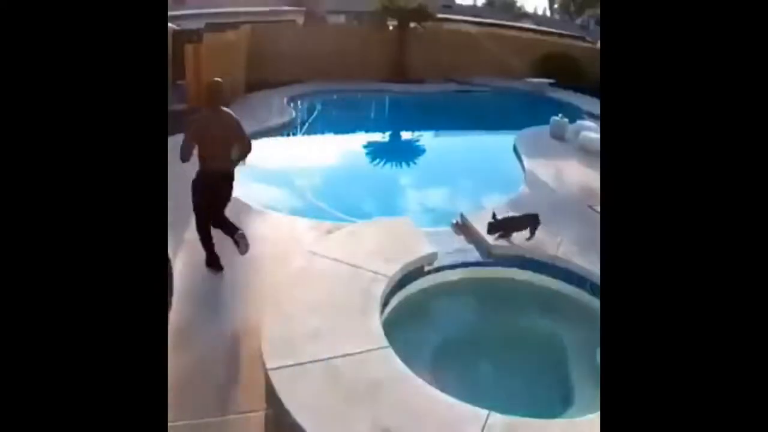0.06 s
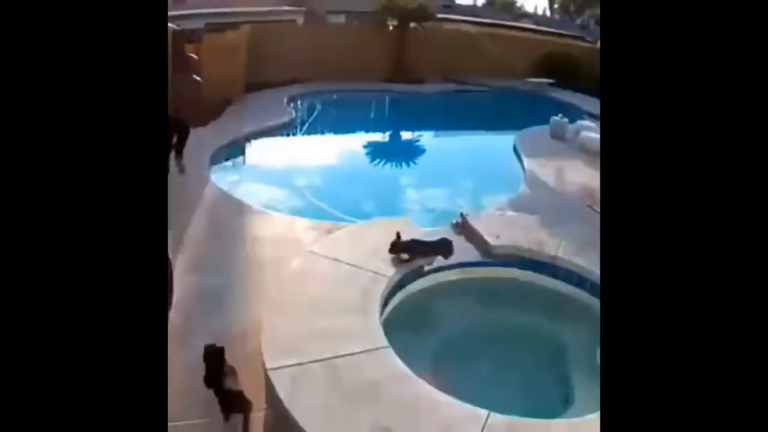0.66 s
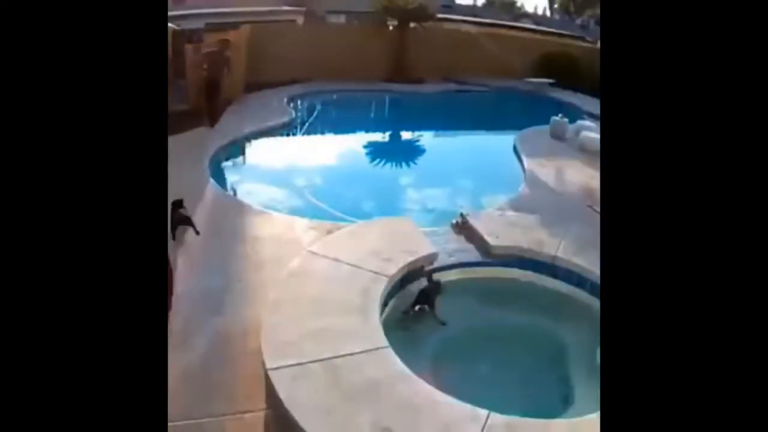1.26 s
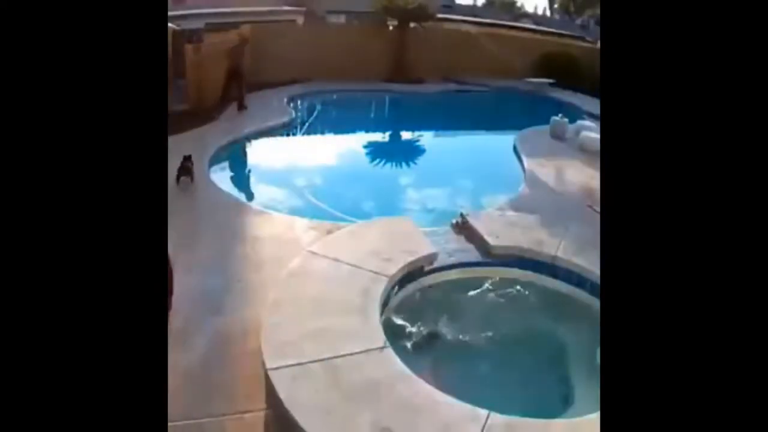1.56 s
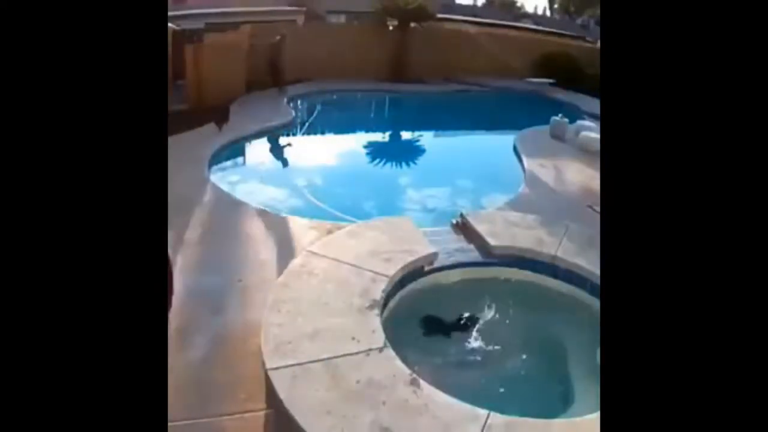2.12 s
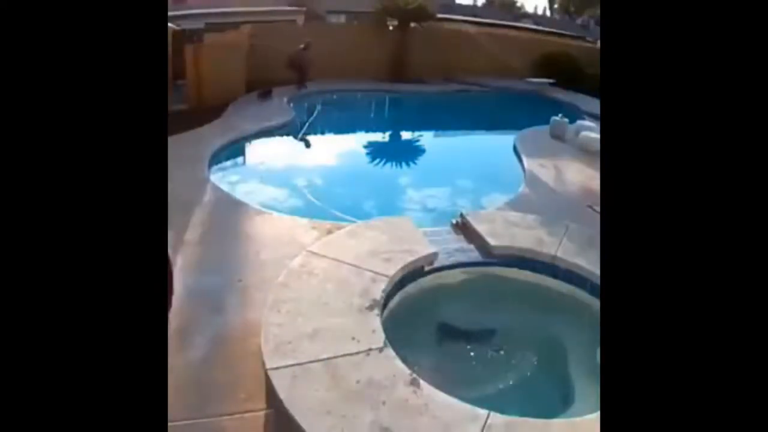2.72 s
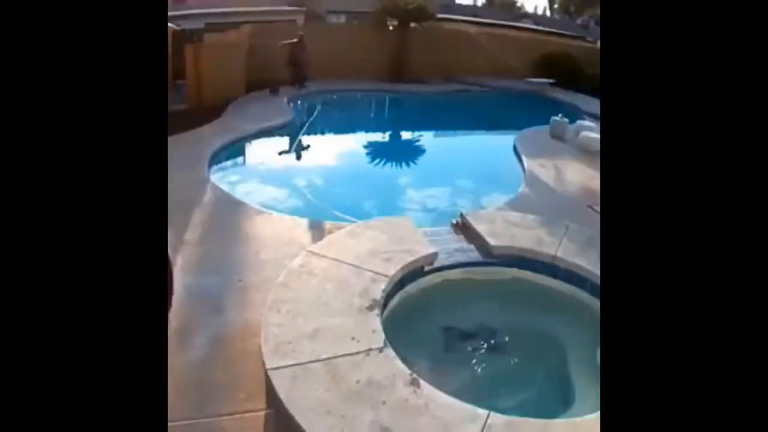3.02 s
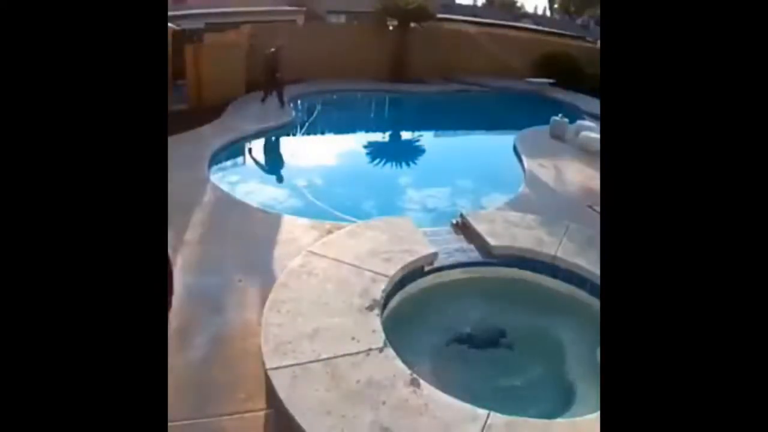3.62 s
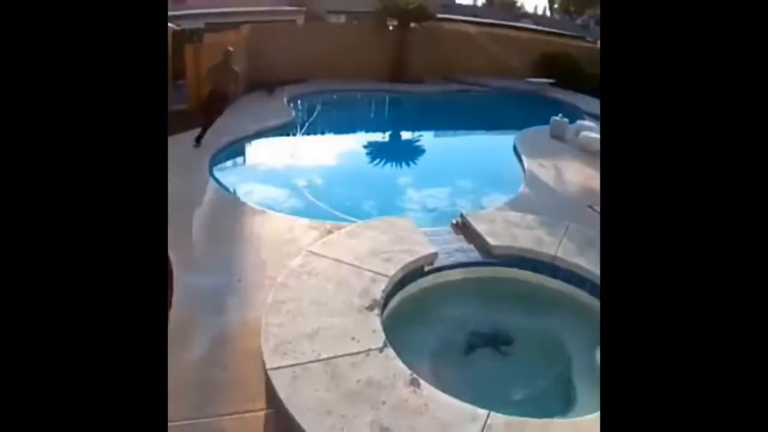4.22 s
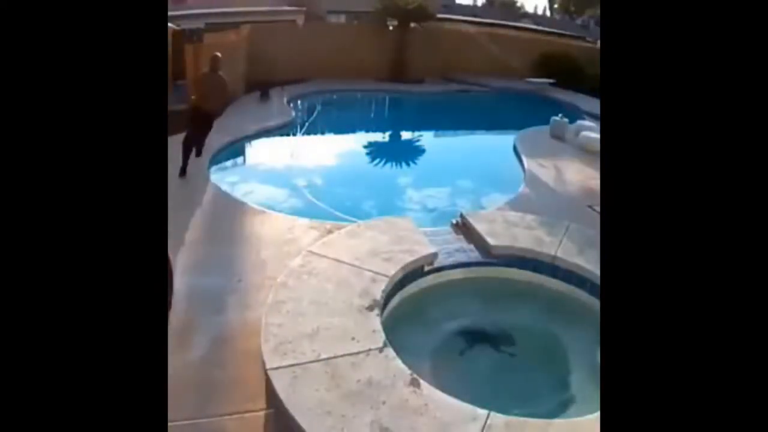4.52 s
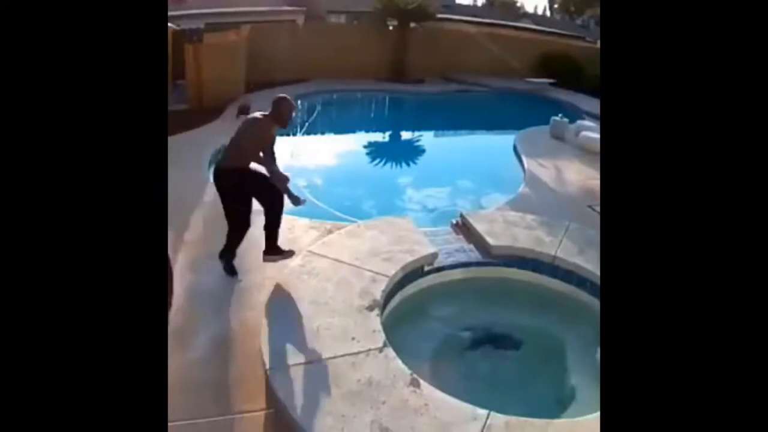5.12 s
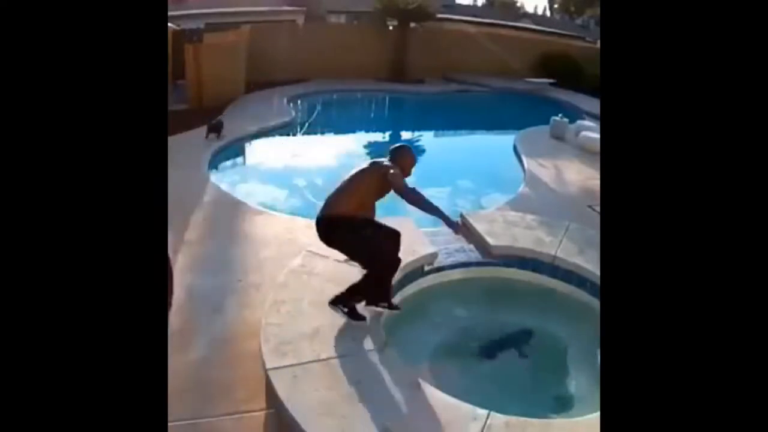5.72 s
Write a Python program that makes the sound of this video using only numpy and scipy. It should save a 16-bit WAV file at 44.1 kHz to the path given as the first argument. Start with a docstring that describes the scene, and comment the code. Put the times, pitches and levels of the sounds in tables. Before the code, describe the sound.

Shoes and paws scuff over a gritty concrete pool deck. A small dog falls into a hot tub with a splash, paddles with pattering spray and low gulps, then sinks, leaving fizzing bubbles and soft laps. Running footsteps come back and end in sharp, loud slaps at the rim. A faint distant engine hums and a light breeze touches the small, slightly dull microphone outdoors.

```python
"""Shoes scuff away over the concrete of a backyard pool deck, and a small dog scrabbles at a hot tub's rim.
It falls in: spray patters and trapped air gulps as it paddles, then the water fizzes and laps as it sinks.
The man who ran off sprints back, and his soles slap down at the rim. Far off an engine hums.
All is heard in the open air on one small, narrow-band camera microphone, a light breeze touching it."""
import sys
import numpy as np
from scipy import signal
from scipy.fft import rfft, irfft
from scipy.io import wavfile

SR = 44100
rng = np.random.default_rng(int(sys.argv[2]) if len(sys.argv) > 2 else 0)


def output_pcm(signal):
    """Save a mono or channel-first signal as 16-bit PCM at the path in sys.argv[1].

    Samples are clipped to [-1, 1] before scaling.
    """
    pcm = np.clip(np.atleast_2d(signal).T, -1, 1) * 32767
    wavfile.write(sys.argv[1], SR, np.round(pcm).astype(np.int16))


N = 254456
T = np.arange(N) / SR

# Soles and paws dragging on the deck. Each row: peak in seconds, hiss in dB, rasp in dB, rise in seconds.
DECK_SCUFFS = [(0.104, -34.5, -73, .0025), (0.136, -29.5, -48, 0.01), (.254, -35, -52, 0.033),
               (0.335, -29.5, -50.5, 0.018), (0.469, -33.5, -64, 0.011), (.535, -40.5, -56, 0.0051),
               (0.583, -39.5, -44, 0.019), (.663, -38.5, -53.5, 0.048), (0.726, -41.5, -54, 0.02),
               (0.878, -39, -51, 0.022), (0.91, -39.5, -63, 0.017), (1.032, -35, -46.5, 0.011),
               (3.63, -51, -57.5, 0.016), (3.971, -49.5, -54, 0.013), (4.505, -53, -54, 0.025),
               (4.916, -47.5, -47.5, 0.034), (5.016, -45, -57, 0.019), (5.142, -54, -42.5, 0.013)]
# Lone bubbles, squeaks and thumps.
# Each row: start in seconds, first and last pitch in Hz, length in seconds, level in dB.
GLIDES = [(0.135, 1190, 1730, 0.019, -39.5), (.215, 178, 143, 0.018, -50), (1.405, 184, 154, 0.031, -41.5),
          (2.796, 3510, 3860, 0.01, -47), (2.877, 998, 1194, 0.054, -54.5), (5.315, 823, 1597, 0.033, -47),
          (5.526, 2970, 2860, 0.011, -51.5)]
# Soles and claws touching down. Each row: start in seconds, click in dB, knock in Hz, knock in dB.
FOOTFALLS = [(.189, -36, 1440, -43), (0.406, -50, 1360, -56), (0.59, -54, 2080, -41),
             (.730, -56, 1400, -47), (3.626, -62, 3900, -48.5), (4.289, -45.5, 675, -42),
             (4.319, -51, 2270, -50), (4.354, -53, 1920, -47.5), (4.582, -46, 710, -47.5),
             (4.6, -44.5, 2030, -42), (4.631, -53, 2100, -49), (4.726, -47, 1950, -38),
             (4.743, -52, 2400, -46), (4.835, -41.5, 1950, -42.5), (4.8574, -40.5, 2000, -39.5),
             (4.891, -45, 503, -47.5), (4.9354, -35.5, 840, -45), (5.114, -45.5, 660, -45.5),
             (5.1232, -43, 2010, -56), (5.728, -40, 2560, -40)]
# Wind on the microphone. Each row: peak in seconds, level in dB, rise and fall in seconds.
WIND_PUFFS = [(.2, -52.5, 0.26), (.55, -53, 0.073), (5.03, -56, 0.44)]
# The far engine's speed. Each row: time in seconds, firing rate in Hz.
ENGINE_FIRING = [(.7, 71.5), (1.08, 75.6), (1.3, 86.07), (3.3, 82.8)]
# The dog's body and legs plunging into the tub.
# Each row: peak in seconds, spray in dB, air pocket in Hz, pocket in dB, fall in seconds.
DOG_PLUNGES = [(1.292, -45, 593, -42, 0.025), (1.315, -28.5, 600, -48, 0.0087),
               (1.396, -49, 350, -37, 0.012), (1.419, -32.5, 176, -51, 0.03),
               (1.452, -33, 537, -43.5, 0.024), (1.527, -48, 595, -39, 0.023),
               (1.642, -45, 465, -32.5, 0.025), (2.089, -31, 570, -41, 0.08),
               (2.108, -36, 104, -48.5, 0.02), (2.112, -40, 545, -31, 0.0093),
               (2.162, -41, 575, -34.5, 0.025)]
# Lone drops and flicks of water. Each row: start in seconds, level in dB, pitch in Hz.
WATER_DROPS = [(1.254, -37.5, 5060), (1.36, -38.5, 6300), (1.83, -34.5, 6300), (2.278, -39, 6460),
               (2.308, -40, 2200), (2.35, -37, 5470), (2.526, -42, 4550), (2.597, -51, 6500),
               (3.136, -50, 4100)]
# Air from the sunken dog reaching the surface. Each row: peak in seconds, level in dB.
AIR_FIZZES = [(2.53, -74), (2.62, -50), (2.939, -52), (3.14, -55), (3.3, -56.5)]
# Waves against the tub wall. Each row: peak in seconds, level in dB, rise and fall in seconds.
WALL_LAPS = [(3.27, -52, 0.078), (3.72, -54.5, 0.13), (4.08, -55, 0.1)]
# Shoes striking the deck at the rim.
# Each row: start in seconds, clap in dB, clap in Hz, heel thud in dB, crunch's 60 dB decay in seconds.
SHOE_SLAPS = [(5.1535, -28.5, 1850, -27, 0.0077), (5.156, -39, 2090, -30.5, 0.012),
              (5.5910, -23, 2410, -34, 0.0064), (5.6, -20.5, 2600, -56, 0.016),
              (5.6034, -21.5, 2880, -29.5, 0.018), (5.6559, -29, 2320, -27, 0.029)]

# The tone colour of each source at the microphone. Each row: frequency in Hz, relative level in dB.
AIR_COLOUR = [(25, -0.5), (65, 5), (200, -0.5), (746, -8), (1050, -9), (1550, -16.5), (1970, -9),
              (2400, -20.5), (7300, -23.5)]
HISS_COLOUR = [(400, -29), (1500, -35), (2700, -8), (4500, -1), (5500, 0), (6700, 4.5), (8000, 0)]  # deck grit and fine bubbles
RASP_COLOUR = [(80, 5.5), (200, -1), (700, 7), (900, -2), (1250, -4), (1650, -5), (2000, 3), (2800, -4),
               (4000, 5.5), (8000, -22.5)]
CLICK_COLOUR = [(400, -12), (2000, 1.5), (4000, -0.5), (8000, -3)]
SPRAY_COLOUR = [(300, -43), (800, -8), (950, -8.5), (1300, -0.5), (1650, -10), (2050, 1), (2350, -7.5),
                (2650, 0), (3500, -6.5), (4600, -2.5), (5400, -4), (7000, -0.5), (8000, -1)]
SLOSH_COLOUR = [(60, 0.5), (130, -25.5), (570, 0), (760, 0), (900, -8.5), (2000, -49)]
FOAM_COLOUR = [(300, -25), (1500, -2), (2600, 1), (8000, -2)]
SNAP_COLOUR = [(500, -41), (2000, -12), (3500, -2), (4500, 1), (5400, -8.5), (6400, -2), (8000, -8.5)]
THUD_COLOUR = [(90, -26), (220, -15.5), (320, -5.5), (730, -5.5), (900, -17.5), (1400, -12.5), (2200, -5),
               (8000, -52)]

# The dog's hind legs touch the water; it thrashes fully, starts to paddle, and sinks.
TOUCH_S, THRASH_S, PADDLE_S, SINK_S = 1.205, 1.38, 1.535, 2.161


def undb(db):
    """Decibels to gain."""
    return 10 ** (np.asarray(db) / 20)


def unit(x):
    """Scale to rms 1."""
    return x / np.sqrt(np.mean(x ** 2))


def together(levels):
    """The level of unrelated sounds heard at once."""
    return np.sqrt(sum(level ** 2 for level in levels))


def add(out, s, sound):
    """Mix a sound in at s seconds."""
    i = int(np.clip(s * SR, 0, N))
    out[i:i + len(sound)] += sound[:N - i]


def colour(x, points, size=4096):
    """Causal filter with the given tone colour, rolled off above 12 kHz; white noise keeps its power."""
    hz, db = np.transpose(points)
    bins = np.maximum(np.arange(size // 2 + 1) * SR / size, 1)
    shape = undb(np.interp(np.log(bins), np.log(hz), db)) / (1 + (bins / 12000) ** 8)
    cepstrum = irfft(np.log(shape))
    cepstrum[1:size // 2] *= 2  # fold to minimum phase
    cepstrum[size // 2 + 1:] = 0
    response = irfft(np.exp(rfft(cepstrum)))
    return signal.fftconvolve(x, response / np.linalg.norm(response))[:len(x)]


def band(x, hz, octaves):
    """Band-pass around a centre."""
    edges = np.clip([hz * 2 ** (-octaves / 2), hz * 2 ** (octaves / 2)], 1, SR / 2 - 1)
    return signal.sosfilt(signal.butter(2, edges, "band", fs=SR, output="sos"), x)


def noise_band(hz, octaves):
    """A band of noise, rms 1."""
    return unit(band(rng.standard_normal(N), hz, octaves))


def wander(rate):
    """A random drift that turns about rate times a second, rms 1."""
    knots = rng.standard_normal(4096)
    return unit(np.interp(T * rate, np.arange(len(knots)), knots))


def swell(s, rise, fall, hold=0):
    """An envelope that climbs to 1 at s seconds, holds and dies away."""
    return np.exp(-np.clip(np.maximum((s - T) / rise, (T - s - hold) / fall), 0, 20))


def grit(rate, spread_db):
    """Tiny impacts, about rate a second, most small and a few large; rms 1."""
    sizes = undb(spread_db * np.minimum(rng.exponential(size=N), 4)) * rng.choice([-1, 1], N)
    return unit(sizes * (rng.random(N) < rate / SR))


def grains(low_hz, high_hz, cycles, glide, spread_db, count):
    """A cloud of short rings; with a glide they are bubbles, climbing in pitch near the surface."""
    out = np.zeros(N)
    for when, pitch, life, size_rank in rng.random((count, 4)):
        hz = low_hz * (high_hz / low_hz) ** pitch
        length = cycles * (.5 + life) / hz
        age = np.arange(int(length * SR) + 2) / (length * SR)
        ring = np.sin(2 * np.pi * hz * length * age * (1 + glide * age / 2)) * undb(-50 * age)
        gain = np.sqrt(hz) * undb(-spread_db * np.log(.02 + size_rank))
        add(out, when * N / SR, gain * ring)
    return unit(out)


def burst(t60, push):
    """A blow: one sharp push, then crushed grit or spray that dies away."""
    age = T[:SR // 10]
    return push * (age == 0) + rng.standard_normal(len(age)) * np.exp(-np.log(1000) * age / t60)


def at_level(x, db):
    """Give a short sound the energy of 5 ms at an rms level of db."""
    return undb(db) * x * np.sqrt(.005 * SR) / np.linalg.norm(x)


def breeze(air_db=-56, rumble_db=-69.5):
    """Open air all around; each gust adds a broad rush and a low rumble right on the microphone."""
    gusts = together(undb(db) * swell(s, width, width) for s, db, width in WIND_PUFFS)
    air = unit(colour(rng.standard_normal(N), AIR_COLOUR))
    air *= together([undb(air_db + .5 * wander(rate=1.8)), gusts])
    rumble = noise_band(40, octaves=0.61) * together([undb(rumble_db), gusts])
    return air + rumble * undb(wander(rate=5.6))


def scuffs():
    """Soles and paws drag over sandy concrete: the grit hisses and the rubber gives a chirpy rasp."""
    drags = [(swell(s, rise, fall=0.0077), hiss_db, rasp_db) for s, hiss_db, rasp_db, rise in DECK_SCUFFS]
    # Light shuffling between steps fades as the man runs off and grows as he comes back.
    leaving_db = -50.5 - 11 * T
    returning_db = -54 - 8 * np.abs(5.73 - T)
    shuffle = undb(np.maximum(leaving_db, returning_db) + 4.5 * wander(rate=27))
    hiss_level = together([undb(db) * drag for drag, db, _ in drags] + [shuffle])
    rasp_level = together([undb(db) * drag for drag, _, db in drags] + [undb(-1.5) * shuffle])
    slips = grains(1200, 3600, cycles=22, glide=0, spread_db=2, count=2600)
    rasp = unit(grit(rate=3000, spread_db=1.5) + slips)
    hiss = grit(rate=6200, spread_db=5)
    return colour(hiss_level * hiss, HISS_COLOUR) + colour(rasp_level * rasp, RASP_COLOUR)


def squeaks_and_bubbles():
    """Short gliding tones: rubber squeaking on the deck, low thumps and lone bubbles in the tub."""
    out = np.zeros(N)
    for s, start_hz, end_hz, length, db in GLIDES:
        age = np.linspace(0, 1, int(length * SR) + 2)
        waver = 1 + 0.079 * wander(rate=463)[:len(age)]
        hz = (start_hz + (end_hz - start_hz) * age) * waver
        envelope = 2 * undb(db) * np.sin(np.pi * np.sqrt(age))
        add(out, s, envelope * np.sin(2 * np.pi * np.cumsum(hz) / SR))
    return out


def footfalls():
    """Shoes and claws touch down: grit clicks on the concrete and the sole gives a hollow knock."""
    out = np.zeros(N)
    for s, click_db, knock_hz, knock_db in FOOTFALLS:
        click = colour(burst(t60=.035, push=6), CLICK_COLOUR)
        knock = band(burst(t60=.08, push=6), knock_hz, octaves=0.31)
        add(out, s, at_level(click, click_db) + at_level(knock, knock_db))
    return out


def far_engine(on_s=0.42, off_s=3.33, level_db=-58):
    """Far from the yard an engine hums at its firing rate: it comes in, speeds up, holds and fades."""
    firing_hz = np.interp(T, *np.transpose(ENGINE_FIRING)) * (1 + 0.0167 * wander(rate=21))
    phase = 2 * np.pi * np.cumsum(firing_hz) / SR
    hum = unit(np.sin(phase) + undb(-20.5) * np.sin(2 * phase))
    running = swell(on_s, rise=0.034, fall=0.23, hold=off_s - on_s)
    return hum * running * undb(level_db + wander(rate=6.2))


def paddling(strokes_per_s=9):
    """Levels of spray and slosh: the dog thrashes, paddles evenly and sinks; waves lap the tub wall."""
    build = np.exp(np.minimum(T - THRASH_S, 0) / 0.12) * (T > TOUCH_S)
    sunk_s = np.maximum(T - SINK_S, 0)
    spray = build * undb(-38.5 - 28 * sunk_s + 1.3 * wander(rate=17))
    slosh = build * undb(-52.5 - 19.5 * sunk_s)
    stroke_times = np.arange(PADDLE_S, SINK_S, 1 / strokes_per_s)
    strokes = [undb(-50) * swell(s, rise=0.017, fall=0.012) for s in stroke_times]
    laps = [undb(db) * swell(s, width, width) for s, db, width in WALL_LAPS]
    return spray, together([slosh] + strokes + laps)


def splash(settle_s=0.98):
    """In the tub, spray patters and leaves bubbles; each plunge traps a pocket of air that gulps."""
    spray_level, slosh_level = paddling()
    gulps = np.zeros(N)
    for s, spray_db, pocket_hz, pocket_db, fall in DOG_PLUNGES:
        plunge = swell(s, rise=0.003, fall=fall)
        spray_level = together([spray_level, undb(spray_db) * plunge])
        gulps += undb(pocket_db) * plunge * noise_band(pocket_hz, octaves=1)
    patter = grit(rate=18000, spread_db=2)
    fizz = grains(1500, 7300, cycles=45, glide=0.08, spread_db=0, count=12000)
    plinks = grains(1600, 5200, cycles=50, glide=0.1, spread_db=1, count=900)
    wash = unit(patter + undb(-2) * fizz + undb(-9) * plinks)
    # Once the dog sinks, the splashing smooths into an even, foamy hiss.
    calm = np.clip((T - SINK_S) / settle_s, 0, 1)
    spray = np.sqrt(1 - calm) * colour(wash, SPRAY_COLOUR)
    foam = np.sqrt(calm) * colour(wash[::-1], FOAM_COLOUR)
    big_bubbles = grains(119.4, 972, cycles=27, glide=0.5, spread_db=-0.5, count=1800)
    slosh = unit(colour(big_bubbles, SLOSH_COLOUR))
    flutter = unit(undb(3 * wander(rate=130)))
    return (spray + foam) * spray_level + gulps * flutter + slosh * slosh_level


def drops():
    """Single drops and flicks of water smack onto the surface."""
    out = np.zeros(N)
    for s, db, hz in WATER_DROPS:
        smack = band(burst(t60=0.048, push=8), hz, octaves=0.54)
        add(out, s, at_level(smack, db))
    return out


def fizzing():
    """Air from the sunken dog bursts at the surface in puffs of fine bubbles, brighter than the spray."""
    puffs = together(undb(db) * swell(s, rise=0.053, fall=0.056) for s, db in AIR_FIZZES)
    pops = grit(rate=9000, spread_db=2)
    bubbles = grains(2400, 7200, cycles=35, glide=0.08, spread_db=1, count=5000)
    return puffs * colour(unit(pops + bubbles), HISS_COLOUR)


def whine():
    """A faint, thin whine swells and fades in the background."""
    return undb(-72) * noise_band(3570, octaves=.015) * swell(3.7, rise=.9, fall=.7)


def shoe_slaps(push=8.4):
    """Soles land flat at the rim: squeezed air claps, grit snaps, heels thud. Gives claps, impacts."""
    claps, impacts = np.zeros(N), np.zeros(N)
    for s, clap_db, clap_hz, thud_db, t60 in SHOE_SLAPS:
        crunch = burst(t60, push)
        clap = at_level(band(crunch, clap_hz, octaves=0.5), clap_db)
        snap = at_level(colour(crunch, SNAP_COLOUR), clap_db - 1.5)
        thud = at_level(colour(burst(t60=0.033, push=push), THUD_COLOUR), thud_db)
        add(claps, s, clap)
        add(impacts, s, snap + thud)
    return claps, impacts


def yard(x, t60, wet_db):
    """House wall, fence and deck scatter a thin, short tail back to the microphone."""
    age = T[:SR // 2]
    onset = 1 - np.exp(-age / 0.0017)
    tail = rng.standard_normal(len(age)) * np.exp(-np.log(1000) * age / t60) * onset
    return x + undb(wet_db) * signal.fftconvolve(x, tail / np.linalg.norm(tail))[:N]


def scene():
    """From the deck, in mono: feet and water nearby, the engine far off; the claps stay nearly dry."""
    claps, impacts = shoe_slaps()
    near = scuffs() + splash() + drops() + fizzing() + squeaks_and_bubbles()
    deck = yard(near, t60=0.55, wet_db=-7.5)
    deck += yard(claps, t60=.25, wet_db=-12)
    deck += yard(impacts + footfalls(), t60=0.36, wet_db=-6.5)
    return (deck + breeze() + far_engine() + whine())[None]


def record(dry, open_s=.1, top_hz=7350, treble_top_hz=15200):
    """The sound opens at open_s and is cut off above about 7 kHz; two very faint high bands of the sound
    itself, near 10.5 and 15.4 kHz, are added back."""
    opened = dry * np.clip((T - open_s) / .003, 0, 1)
    narrow = signal.sosfilt(signal.ellip(10, .3, 70, top_hz, fs=SR, output="sos"), opened)
    high_bands = undb(-24) * band(opened, 10480, octaves=0.21)
    high_bands += undb(-22) * band(opened, 15400, octaves=0.13)
    return signal.sosfilt(signal.ellip(8, .3, 60, treble_top_hz, fs=SR, output="sos"), narrow + high_bands)


dry = scene()
out = record(dry)
output_pcm(out)
```